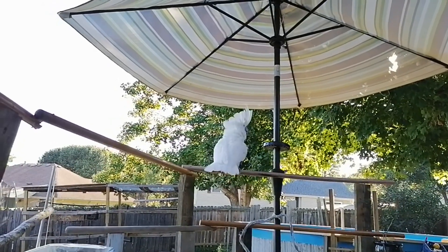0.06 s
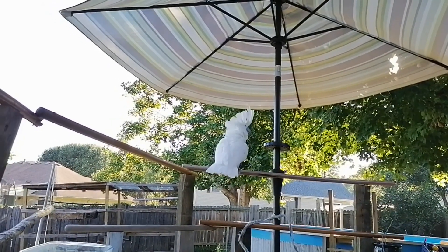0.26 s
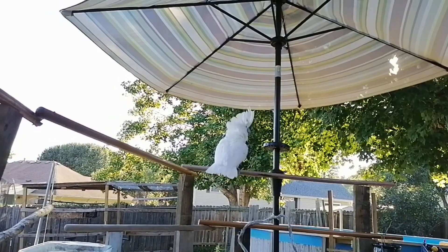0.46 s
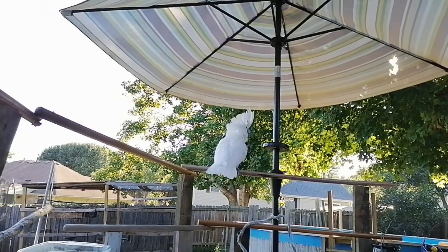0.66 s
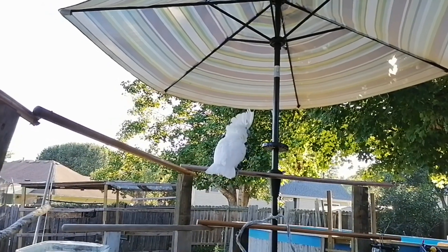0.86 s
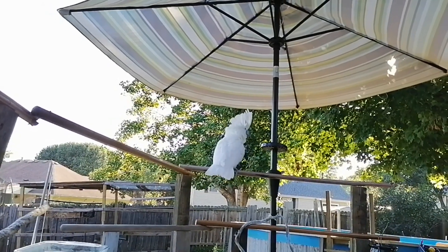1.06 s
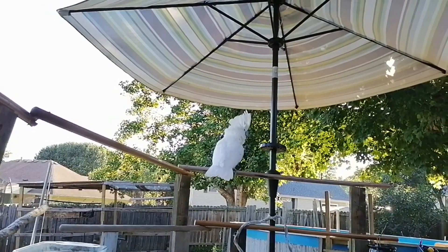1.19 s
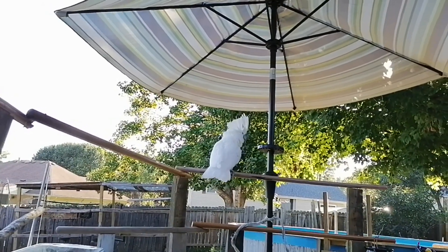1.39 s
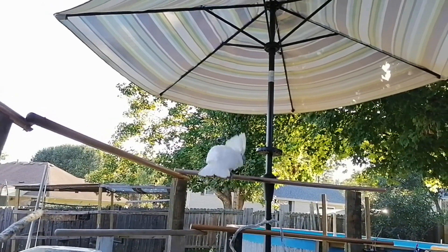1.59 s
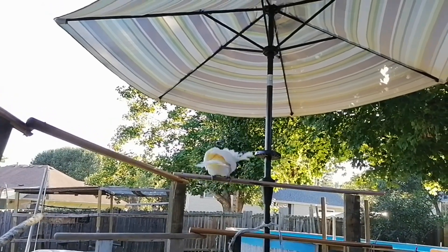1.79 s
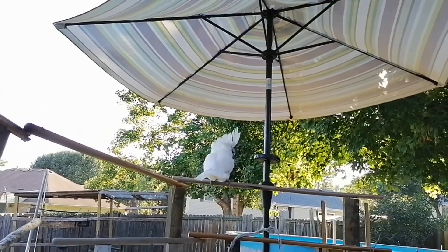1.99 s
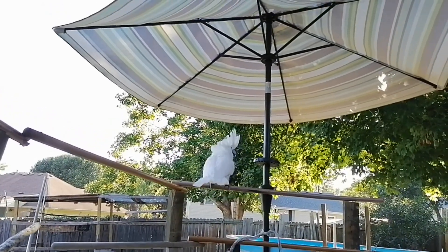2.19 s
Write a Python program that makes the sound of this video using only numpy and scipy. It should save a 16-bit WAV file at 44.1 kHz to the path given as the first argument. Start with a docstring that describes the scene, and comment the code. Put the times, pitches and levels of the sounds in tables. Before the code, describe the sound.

A cockatoo screams loudly and harshly in a back yard, after a fading echo and a few quiet squeaks and whistles. Behind the bird are steady outdoor hiss, a low rumble and a faint motor whine left of the microphone.

```python
"""A back yard with a cockatoo on a perch. The echo of a scream dies away, a squeak cracks upward into a
soft rising whistle, a second squeak follows, then a soft arched whistle.
A loud harsh scream breaks out: syrinx pulses and rasp ring the throat. Fences and walls answer the bird.
A small motor hums and whines to the left over a low rumble and outdoor hiss."""
import sys
import numpy as np
from scipy import signal
from scipy.fft import rfft, irfft
from scipy.io import wavfile
from scipy.ndimage import map_coordinates

SR = 44100
rng = np.random.default_rng(int(sys.argv[2]) if len(sys.argv) > 2 else 0)


def transcribe(u):
    """Save the signal u as a 16-bit wav file named by the first command-line argument.

    u: samples, shape (n,) or (channels, n), limited to [-1, 1]; the rate is SR.
    q: integer samples, one column per channel.
    """
    v = np.clip(np.atleast_2d(u).T, -1, 1)
    q = np.round(v * 32767).astype(np.int16)
    wavfile.write(sys.argv[1], SR, q)


N = 99180
T = np.arange(N) / SR
SIDES = np.array([[1], [-1]])  # left, right


def amp(db):
    """Decibels to gain."""
    return 10 ** (np.asarray(db) / 20)


def unit(x):
    """Scale to rms 1."""
    return x / np.sqrt(np.mean(x ** 2) + 1e-20)


def along(points, hz):
    """Read (freq_hz, value) points on a log axis."""
    freqs_hz, values = np.transpose(points)
    return np.interp(np.log(hz + 1), np.log(freqs_hz + 1), values)


def curves(rows):
    """One per-sample curve for each column after time_s."""
    time_s, *columns = np.transpose(rows)
    return [np.interp(T, time_s, column) for column in columns]


def wobble(knots_per_s):
    """Smooth random curve."""
    return map_coordinates(rng.standard_normal(8192), [T * knots_per_s], mode="wrap")


def filtered(x, response):
    """Apply a frequency response."""
    size = 2 ** 17
    return irfft(rfft(x, size) * response(np.fft.rfftfreq(size, 1 / SR)), size)[..., :N]


def causal(gain):
    """Ringing, minimum-phase response with this gain."""
    cepstrum = irfft(np.log(gain))
    half = len(cepstrum) // 2
    cepstrum[1:half] *= 2
    cepstrum[half + 1:] = 0
    return np.exp(rfft(cepstrum))


def pan(left_db):
    """Stereo gains for a left-minus-right level."""
    return amp(SIDES * left_db / 2)


def rush(spectrum, likeness):
    """Coloured stereo noise, rms 1, with a given left-right correlation."""
    def response(hz):
        angle = np.arccos(np.clip(along(likeness, hz), -1, 1)) / 2
        return amp(along(spectrum, hz)) * [np.cos(angle), np.sin(angle)]
    mid, side = filtered(rng.standard_normal((2, N)), response)
    return unit(np.array([mid + side, mid - side]))


def band(centre_hz, width_hz):
    """Diffuse noise in one resonance."""
    noise = rng.standard_normal((2, N))
    return unit(filtered(noise, lambda hz: 1 / (1 + ((hz - centre_hz) / width_hz * 2) ** 2)))


def tone(pitch_hz, partials, jitter):
    """Slightly unsteady harmonic tone."""
    phase = 2 * np.pi * np.cumsum(pitch_hz * (1 + jitter * wobble(600))) / SR
    return np.sqrt(2) * sum(amp(db) * np.sin(round(k) * phase) for k, db in partials)


def gate(start_s, end_s, edge_s=.005):
    """Note envelope with linear edges."""
    return np.clip(np.minimum(T - start_s, end_s - T) / edge_s, 0, 1)


def motor():
    """Hum and whine: four lines wavering in level and phase."""
    # motor lines: freq_hz, level_db, left_db
    lines = [(42.6, -64.5, 10), (86.15, -49, 8), (1464.3, -52.5, 12), (1514.4, -63, 19.5)]
    out = np.zeros((2, N))
    for hz, db, left_db in lines:
        gain = amp(db + wobble(8.55)) * pan(left_db)
        out += gain * np.sqrt(2) * np.sin(2 * np.pi * hz * T + .13 * wobble(4.6))
    return out


def rumble():
    """Low, unsteady noise to the left."""
    # rumble spectrum: freq_hz, gain_db
    spectrum = [(59, -35), (100, -16), (139, -8), (208, -4), (237, 2.5), (268, -5), (350, -8.5),
                (415, -2.5), (490, -20), (528, -11), (768, -14), (1300, -33.5), (1690, -74)]
    # left-right likeness: freq_hz, correlation
    likeness = [(100, 0.19), (300, 1), (550, 0.11), (1200, 0.13)]
    return amp(-41 + wobble(15.19)) * pan(11.5) * rush(spectrum, likeness)


def air():
    """Outdoor hiss, diffuse in the treble."""
    # hiss spectrum: freq_hz, gain_db
    spectrum = [(20, -26), (45, 7.5), (100, 7.5), (1800, -5), (2900, -8.5), (3900, -20), (6000, -17.5),
                (8500, -15.5), (11500, -25), (15500, -31.5)]
    # left-right likeness: freq_hz, correlation
    likeness = [(60, 1), (1000, 0.6), (8000, 0.046)]
    return amp(-47) * pan(2.5) * rush(spectrum, likeness)


def background(lead_s=.00023):
    """Motor, rumble and hiss, reaching the left microphone first."""
    # background level, low around the screams: time_s, gain_db
    levels = [(0, -6.5), (.135, -2.5), (.16, 0.5), (.76, 2), (.86, -1.5), (.97, 1), (1.06, -1.5),
              (1.2, 1.5), (1.88, 1.5), (1.95, -3.5), (2.04, -9), (2.25, -9)]
    gain_db, = curves(levels)
    bed = amp(gain_db) * (motor() + rumble() + air())
    return filtered(bed, lambda hz: np.exp(1j * np.pi * hz * lead_s * SIDES))


def scream_echo():
    """Resonances of an earlier scream fade in the yard."""
    # resonances: peak_s, rise_s (per 6 dB), fade_db_per_s, centre_hz, width_hz, level_db
    resonances = [(0.0012, 0.0051, 146, 2100, 310, -37.5), (0.04, 0.059, 161, 3030, 680, -47),
                  (0.038, 0.059, 215, 4900, 1840, -41.5), (0.0042, .003, 169, 1135, 30, -48.5),
                  (0.043, 0.066, 200, 9000, 3500, -54.5)]
    out = np.zeros((2, N))
    for peak_s, rise_s, fade_db_per_s, centre_hz, width_hz, db in resonances:
        drop_db = np.maximum(fade_db_per_s * (T - peak_s), 6 * (peak_s - T) / rise_s)
        out += amp(db - drop_db) * band(centre_hz, width_hz)
    return out


def rasps():
    """Two faint swells of narrow-band noise."""
    # rasps: peak_s, span_s, centre_hz, width_hz, level_db
    swells = [(.425, 0.038, 3100, 503, -53), (1.868, 0.045, 5700, 670, -49)]
    return sum(amp(db) * np.exp(-((T - peak_s) / span_s) ** 2) * band(centre_hz, width_hz)
               for peak_s, span_s, centre_hz, width_hz, db in swells)


def notes(rows, partials, jitter, scoop=0, scoop_s=.002):
    """Short rising notes; each snaps up from below by the share scoop of its pitch."""
    out = np.zeros(N)
    for start_s, length_s, hz, rise_hz_per_s, db in rows:
        age_s = np.clip(T - start_s, 0, length_s)
        pitch_hz = (hz + rise_hz_per_s * age_s) * (1 - scoop * np.exp(-age_s / scoop_s))
        out += amp(db) * gate(start_s, start_s + length_s) * tone(pitch_hz, partials, jitter)
    return out


def squeaks(crack_delay_s=.002, crack_span_s=.015):
    """Two squeaks: a reedy note, a noisy crack as the voice jumps, a thin peep."""
    # reedy notes and peeps: start_s, length_s, pitch_hz, rise_hz_per_s, level_db
    reeds = [(.779, 0.041, 2210, 1800, -46.5), (.976, 0.043, 2194, 1580, -45.5)]
    peeps = [(0.813, 0.024, 5980, 7300, -33.5), (1.013, 0.032, 6076, 10800, -37)]
    # their partials: harmonic, gain_db
    reed_partials = [(1, -11.5), (2, -1), (3, -9), (4, -9), (5, -17)]
    peep_partials = [(1, -1.5), (2, -25)]
    # crack spectrum: freq_hz, gain_db
    spectrum = [(3500, -11.5), (4500, -3), (5700, -2.5), (7500, -5.5), (12500, -13.5), (13500, -37)]
    bursts = sum(np.exp(-((T - start_s - crack_delay_s) / crack_span_s) ** 2) for start_s, *_ in peeps)
    noise = unit(filtered(rng.standard_normal(N), lambda hz: amp(along(spectrum, hz))))
    reed = notes(reeds, reed_partials, jitter=.022)
    peep = notes(peeps, peep_partials, jitter=.018, scoop=.35)
    return reed + peep + amp(-45.5) * bursts * noise


def yard(x, wet_db):
    """Direct sound plus scatter from fences and walls."""
    # yard decay: freq_hz, t60_s
    decay = [(300, 0.51), (2500, 0.28)]
    hz, time_s, spectra = signal.stft(rng.standard_normal((2, SR // 2)), SR, nperseg=256)
    fade = amp(-60 * time_s / along(decay, hz)[:, None])
    _, tail = signal.istft(spectra * fade, SR, nperseg=256)
    tail /= np.sqrt(np.mean(abs(rfft(tail)[:, 500:4000]) ** 2))  # unit gain over about 1-8 kHz
    return x + amp(wet_db) * signal.fftconvolve(x[None], tail, axes=1)[:, :N]


def whistles():
    """Two nearly pure glides, one rising, one arched."""
    # glides: time_s, pitch_hz, level_db
    rising = [(.80, 2110, -62), (.828, 2400, -55), (.854, 2480, -39.5), (.868, 2795, -43.5),
              (.886, 2802, -32), (.906, 2890, -63)]
    arched = [(1.185, 2150, -77), (1.205, 2310, -41.5), (1.24, 2620, -50), (1.272, 2657, -37),
              (1.302, 2663, -36.5), (1.328, 2580, -48.5), (1.358, 2360, -35.5), (1.385, 2100, -47),
              (1.405, 2020, -45.5), (1.435, 1800, -53)]
    # whistle partials: harmonic, gain_db
    partials = [(1, -2), (2, -34), (5, -37), (6, -41)]
    out = np.zeros(N)
    for glide, harmonics in (rising, partials[:2]), (arched, partials):
        pitch_hz, db = curves(glide)
        out += amp(db) * gate(glide[0][0], glide[-1][0]) * tone(pitch_hz, harmonics, jitter=.011)
    return out


def syrinx(jitter=.021, scatter_db=1.5, weak_db=-8, puff_s=.0017, rasp_db=-6):
    """Alternating strong and weak pulses, each with a puff of rasp."""
    # pulse rate: time_s, rate_hz
    rates = [(1.89, 450), (1.94, 478.1), (1.98, 477.2), (2.04, 394.8), (2.08, 393.7), (2.1, 452.7),
             (2.25, 443.5)]
    rate_hz, = curves(rates)
    cycles = np.cumsum(rate_hz * (1 + jitter * wobble(350))) / SR
    onsets = np.flatnonzero(np.diff(np.floor(cycles)) > 0)
    weak = np.arange(len(onsets)) % 2
    pulses = np.zeros(N)
    pulses[onsets] = amp(scatter_db * rng.standard_normal(N)[:len(onsets)] + weak_db * weak)
    puffs = signal.lfilter([1], [1, -np.exp(-1 / (puff_s * SR))], pulses) * rng.standard_normal(N)
    return unit(pulses) + amp(rasp_db) * unit(puffs)


def opening(hz, start_s=1.872, attack_s=.05, climb_hz_per_s=250000):
    """Scream attack, low registers first."""
    return np.clip((T - start_s - hz / climb_hz_per_s) / attack_s, 0, 1) ** 2


def throat(pulses):
    """Pulses ring the throat; four registers swell separately."""
    # throat response: freq_hz, gain_db
    formants = [(450, -34), (750, -31), (1090, -17.5), (1450, -18), (1700, -12.5), (1950, 2), (2250, 1),
                (2620, -1.5), (2880, 1.5), (3250, 1.5), (3600, -14), (4050, -20), (4600, -14.5),
                (5350, -9.5), (5900, -22), (6500, -17), (7150, -19), (7650, -32), (8700, -29.5),
                (11500, -42), (15500, -41)]
    # register bounds: edge_hz
    edges_hz = [450, 1700, 2400, 3800, 16000]
    # register gains: time_s, low_db, main_db, upper_db, treble_db
    gains = [(1.894, -29.5, -25.5, -35, -27.5), (1.94, -34.5, -34.5, -31.5, -30.5),
             (1.985, -28, -27.5, -28, -32), (2.02, -34.5, -29.5, -28.5, -30), (2.07, -34.5, -28, -32, -30),
             (2.115, -30, -25, -23.5, -29.5), (2.19, -31, -25.5, -29, -27), (2.25, -28.5, -26.5, -25, -30)]
    voice = filtered(pulses, lambda hz: causal(amp(along(formants, hz))))
    out = np.zeros(N)
    for low_hz, high_hz, db in zip(edges_hz, edges_hz[1:], curves(gains)):
        part = filtered(voice, lambda hz: 1 / (1 + (low_hz / (hz + 1)) ** 20) / (1 + (hz / high_hz) ** 20))
        out += opening(low_hz) * amp(db) * unit(part)
    return out


def strands(waver=.011):
    """Three wavering tones stand out of the scream's rasp."""
    # strands: time_s, pitch_hz, level_db
    low = [(1.9, 779, -40), (1.95, 925, -49), (2.015, 902.6, -56), (2.04, 1060, -45.5), (2.11, 1143, -41),
           (2.25, 1105, -46)]
    middle = [(1.901, 1338, -36), (2.01, 1490, -42.5), (2.042, 1430, -34.5), (2.066, 1520, -28),
              (2.099, 1530, -30), (2.125, 1550, -43), (2.175, 1530, -32), (2.25, 1497, -32)]
    high = [(1.911, 1990, -38.5), (1.95, 1895, -29), (2.009, 1885, -39.5), (2.061, 1920, -27),
            (2.099, 1990, -45), (2.135, 2045, -26), (2.181, 1990, -29), (2.205, 1935, -24.5),
            (2.25, 1930, -26.5)]
    return opening(0) * sum(amp(db) * tone(hz * (1 + waver * wobble(180)), [(1, 0)], jitter=.026)
                            for hz, db in map(curves, [low, middle, high]))


def scream(surge_db=1.2):
    """Harsh voice and strands surge unevenly together and ring in the yard."""
    # stereo balance: freq_hz, left_db
    balance = [(1300, 0.5), (2100, -5), (3200, 4.5), (4500, -1.5), (6500, -10), (9000, 4)]
    voice = throat(syrinx())
    tones = strands()
    surges = unit(amp(surge_db * wobble(180)))
    heard = amp(-6.5) * yard(surges * voice, wet_db=2.5) + yard(surges * tones, wet_db=-2)
    return filtered(heard, lambda hz: pan(along(balance, hz)))


def scene():
    """The bird in its yard, background to the left."""
    calls = yard(squeaks(), wet_db=4) + yard(whistles(), wet_db=1)
    return background() + pan(1.5) * calls + scream() + scream_echo() + rasps()


def record(dry):
    """Band limit at 15.7 kHz."""
    return filtered(dry, lambda hz: hz < 15700)


dry = scene()
out = record(dry)
transcribe(out)
```